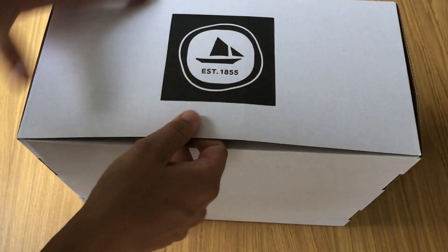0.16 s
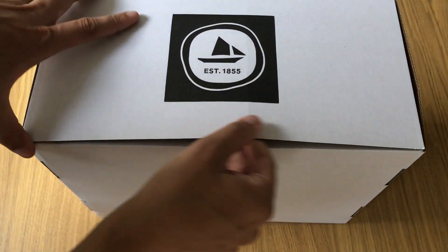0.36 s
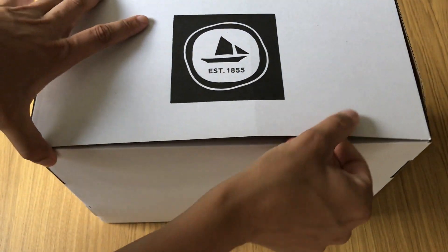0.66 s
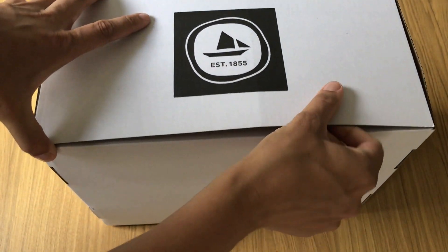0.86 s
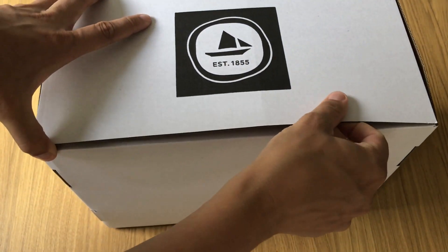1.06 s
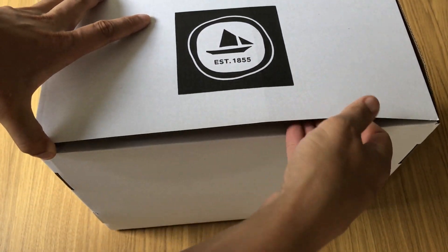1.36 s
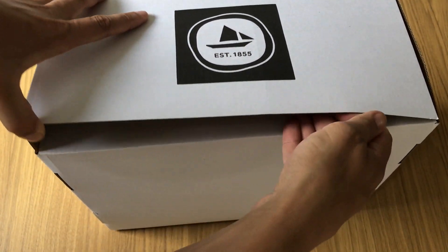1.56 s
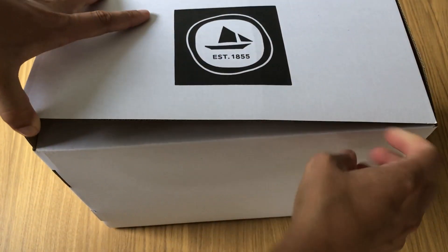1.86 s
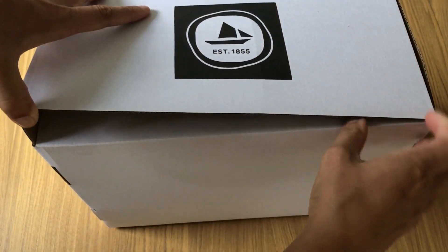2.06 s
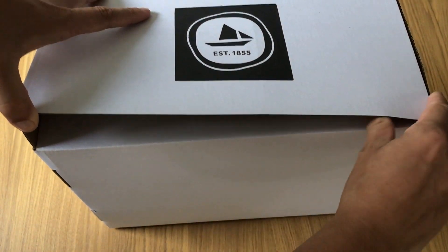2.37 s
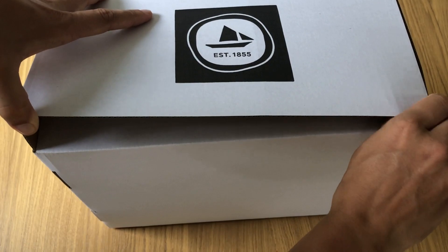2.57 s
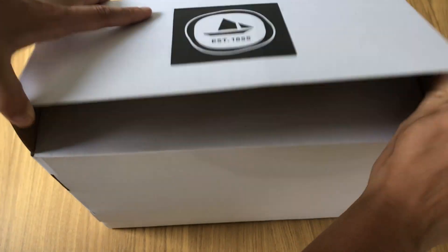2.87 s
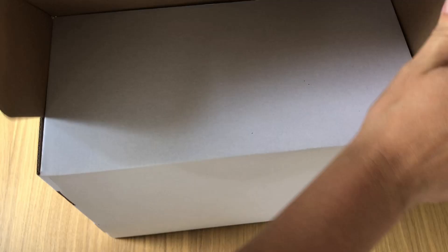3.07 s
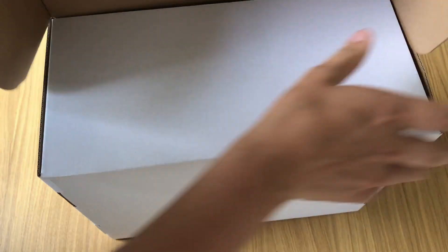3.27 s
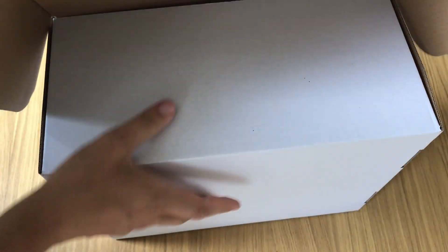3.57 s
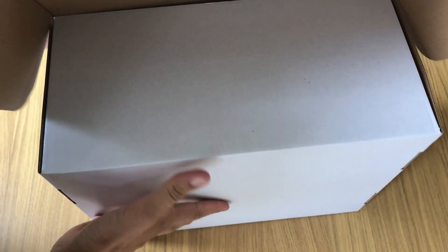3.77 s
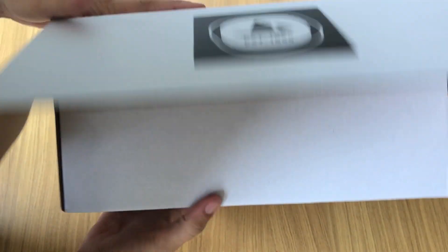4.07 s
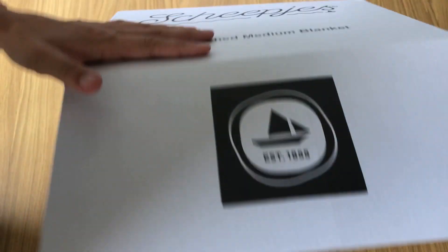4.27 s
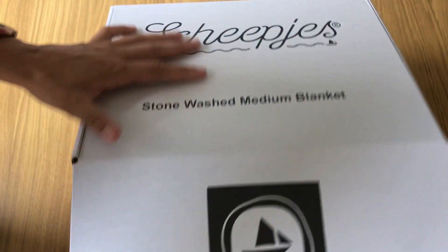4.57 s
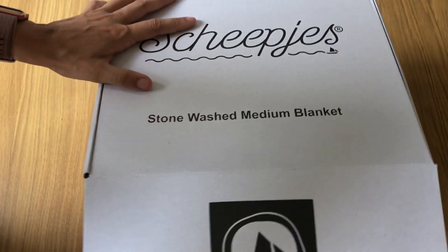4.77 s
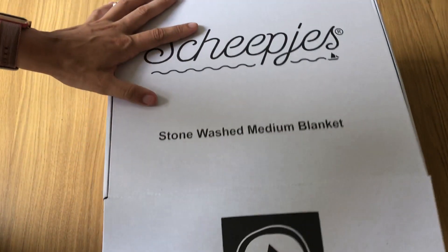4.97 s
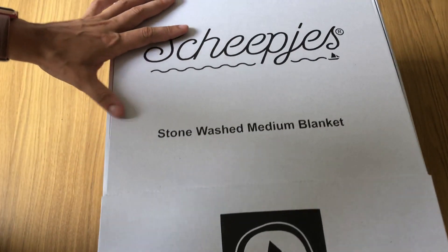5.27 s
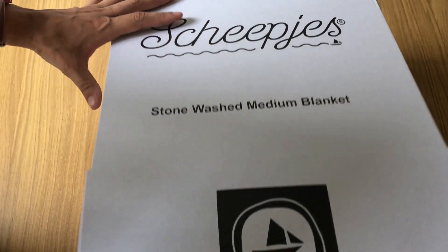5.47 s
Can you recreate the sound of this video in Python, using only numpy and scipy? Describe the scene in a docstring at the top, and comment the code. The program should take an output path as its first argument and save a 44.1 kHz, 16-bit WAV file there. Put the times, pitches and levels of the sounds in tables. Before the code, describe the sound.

Skin brushes dry cardboard, with faint fingertip rasps and small edge clicks. Prying grows into gritty scraping and hollow panel knocks. The flaps slide out with a falling rub, hands sweep brightly across the board, the box shifts with dull thuds, and the folded lid settles with knocks and a tiny creak. One close microphone, quiet indoor room, little reverberation.

```python
"""Hands rub and pry at the front lip of a cardboard box on a wooden table, amid panel knocks and edge ticks.
From 1.9 s the side flaps scrape, two of them sliding with shifting resonances; near 3.3 s the lid swings open
and the echoes of the skin hiss lengthen. The folded-back lid creaks once near 5.2 s, over a quiet room and air.
Friction is snaps in noise, shaped by spectra and resonances; knocks and ticks are decaying sines and noise bursts.
One close microphone, the same in both channels."""
import sys
import numpy as np
from scipy import signal
from scipy.fft import rfft, irfft, next_fast_len
from scipy.io import wavfile
from scipy.ndimage import uniform_filter1d

SR = 44100
rng = np.random.default_rng(int(sys.argv[2]) if len(sys.argv) > 2 else 0)


def master(y):
    """Save y as 16-bit WAV."""
    cut = np.clip(np.atleast_2d(y).T, -1, 1)
    pcm = np.round(cut * 32767)  # scale
    wavfile.write(sys.argv[1], SR, pcm.astype(np.int16))


N = 248283
TIME = np.arange(N) / SR


def amp(db):
    """Decibels to gain."""
    return 10 ** (np.asarray(db) / 20)


def evened(x):
    """Scales to rms 1."""
    return x / np.sqrt(np.mean(x ** 2) + 1e-20)


def read(points, hz):
    """Interpolates a table of (Hz, value) on a log-frequency axis."""
    f, value = np.transpose(points)
    return np.interp(np.log(hz + 1), np.log(f + 1), value)


def curves(rows):
    """The columns of a time table at every sample."""
    s, *columns = np.transpose(rows)
    return [np.interp(TIME, s, column) for column in columns]


def during(rows):
    """1 between the first and last row of a table, with soft ends."""
    inside = (TIME > rows[0][0]) & (TIME < rows[-1][0])
    return uniform_filter1d(1. * inside, size=200)


def add(mix, s, sound):
    """Mixes a sound in at time s."""
    part = mix[max(round(s * SR), 0):][:len(sound)]
    part += sound[:len(part)]


def colour(x, points):
    """Gives x a spectrum, at rms 1."""
    size = next_fast_len(N)
    gain = amp(read(points, np.fft.rfftfreq(size, 1 / SR)))
    return evened(irfft(rfft(x, size) * gain, size)[:N])


def wander(hz):
    """Smooth chance with hz new values a second, at rms 1."""
    return evened(np.interp(TIME * hz, np.arange(24000), rng.standard_normal(24000)))


def resonate(x, hz, width_hz):
    """A resonance of gain 1 that can follow a curve: shift to 0 Hz, low-pass, shift back."""
    turn = np.exp(2j * np.pi * np.cumsum(hz * np.ones(len(x))) / SR)
    r = np.exp(-np.pi * width_hz / SR)
    return 2 * (turn * signal.lfilter([1 - r], [1, -r], x / turn + 1e-18)).real


def ring(x, modes, tuning):
    """Passes x through resonances whose pitches all move by one tuning factor, at rms 1."""
    return evened(sum(amp(db) * resonate(x, hz * tuning, width_hz) for hz, width_hz, db in modes))


def gliding_band(hz, width_hz):
    """Friction noise through a steep resonance that follows a curve, at rms 1."""
    once = resonate(rng.standard_normal(N), hz, width_hz)
    return evened(resonate(once, hz, width_hz))


def friction(per_s, spread_db, share):
    """Fibres catching and letting go: snaps of uneven size, holding a share of the power, in a dense fizz."""
    size = amp(spread_db * np.minimum(rng.exponential(1, N), 4))
    snaps = size * rng.choice([-1, 1], N) * (rng.random(N) < per_s / SR)
    return np.sqrt(share) * evened(snaps) + np.sqrt(1 - share) * rng.standard_normal(N)


RISE_POWER, FALL_POWER = 0.88, 2.4  # a movement starts briskly and trails off


def swell(s, rise, fall):
    """One movement: speed arches up from rest to 1 at time s and eases back to rest."""
    u = np.clip((TIME - s) / np.where(TIME < s, rise, fall), -1, 1)
    out, moving = np.zeros(N), abs(u) < 1
    power = np.where(u[moving] < 0, RISE_POWER, FALL_POWER)
    out[moving] = np.cos(np.pi / 2 * u[moving]) ** power
    return out


def movements(rows, rest_db):
    """One gain curve per level column; overlapping movements add in power over a steady rest level."""
    speeds = np.array([swell(*row[:3]) for row in rows])
    levels = amp([row[3:] for row in rows])
    return np.sqrt(levels.T ** 2 @ speeds ** 2 + amp(rest_db)[:, None] ** 2)


# Strokes of a hand or flap over the board. Each row: fastest at in seconds, rise in seconds, fall in seconds,
# then levels before trim: skin hiss in dB, skin rasp in dB, board scrape in dB, upper panel modes in dB.
STROKE_ROWS = [(.01, 0.042, 0.12, -36.5, -46.5, -47.5, -53), (.115, 0.036, 0.039, -58, -59, -56, -56),
               (.17, 0.58, 0.29, -65, -59, -56, -60), (.245, .035, 0.056, -57, -65, -69, -69),
               (.38, 0.097, 0.14, -46.5, -50.5, -58, -70), (.51, 0.14, 0.38, -45, -48, -55.5, -62.5),
               (.86, 0.21, 0.12, -67, -60.5, -57, -65.5), (1.0, 0.1, 0.29, -74, -63.5, -69, -80),
               (1.24, 0.13, 0.13, -57.5, -53, -56.5, -60), (1.365, 0.21, 0.062, -71, -69, -56, -56.5),
               (1.48, 0.013, 0.047, -63, -75, -56.5, -55), (1.625, 0.085, 0.18, -49.5, -50.5, -45.5, -53.5),
               (1.76, 0.062, 0.081, -55, -57, -47, -58), (1.87, 0.05, 0.055, -54.5, -54.5, -53, -59),
               (1.96, 0.075, 0.051, -52, -54.5, -49.5, -66), (2.03, 0.09, 0.13, -76, -68, -52, -51),
               (2.088, 0.012, 0.021, -67, -53, -53, -54), (2.17, 0.038, 0.17, -69, -55.5, -48.5, -50),
               (2.27, 0.036, 0.19, -53, -57.5, -63, -72), (2.37, 0.045, 0.082, -54, -55, -53, -63),
               (2.47, 0.041, 0.086, -55, -52.5, -47.5, -68), (2.72, 0.42, 0.06, -64, -53.5, -50.5, -64.5),
               (2.815, 0.1, 0.067, -67, -45.5, -41, -44), (2.92, 0.17, 0.1, -48, -48.5, -47, -52),
               (3.11, 0.18, 0.16, -40, -41.5, -39.5, -52.5), (3.23, 0.12, 0.25, -47, -47, -44, -56.5),
               (3.35, 0.057, 0.23, -59, -51.5, -59, -55), (3.543, 0.033, 0.037, -45, -53.5, -44, -45),
               (3.58, 0.017, 0.08, -63, -65, -48, -47), (3.64, 0.081, 0.24, -49, -49.5, -75, -62),
               (3.82, 0.098, 0.17, -44.5, -48.5, -64, -62), (3.97, 0.076, 0.22, -56, -49.5, -52, -50.5),
               (4.11, 0.13, 0.098, -40, -49.5, -56, -61), (4.28, 0.19, 0.24, -37.5, -44.5, -53.5, -46.5),
               (4.5, 0.34, 0.2, -50, -48, -51, -51.5), (4.65, 0.084, 0.23, -47, -49, -54.5, -48),
               (4.79, 0.1, 0.25, -46.5, -47.5, -53.5, -49), (5.07, 0.18, 0.18, -51, -49.5, -53.5, -51),
               (5.22, 0.04, 0.14, -56, -55, -52, -46.5), (5.41, 0.16, 0.098, -64, -59.5, -60, -56.5),
               (5.53, 0.12, 0.22, -55.5, -54, -53.5, -54.5)]
RESTING_DB = (-87, -80, -68, -68)  # resting fingers never lie quite still; same four levels


def stroke_gains():
    """Sliding speed of hands and flaps sets the gains of hiss, rasp, scrape and upper panels."""
    return movements(STROKE_ROWS, RESTING_DB)


# The lid swings open.
SWING_S = (3.27, 0.17, 0.187)  # fastest at, rise, fall
SWING_OCTAVES_PER_S = 1.3
NEAR_ECHO_S = (.0003, .0016)  # shortest and longest delay before swing and drift


def reflected(x, strength, swing_strength, travel):
    """Table, walls and lid return short echoes that drift with the hand and lengthen as the lid swings."""
    s, rise, fall = SWING_S
    opening = SWING_OCTAVES_PER_S * np.clip(TIME - s, -rise, fall)
    delays = np.geomspace(*NEAR_ECHO_S, num=6)
    echoes = np.zeros(N)
    for k, delay in enumerate(delays):
        moving_delay = delay * 2 ** (opening + travel * wander(hz=2))
        echoes += (-1) ** k * np.interp(TIME - moving_delay, TIME, x)
    echo = strength + swing_strength * swell(*SWING_S)
    mixed = (x + echo * echoes / np.sqrt(len(delays))) / np.sqrt(1 + echo ** 2)
    return np.std(x) * evened(mixed)


def bounce(x, delay_s, travel, strength):
    """The table reflects the sound; the delay drifts as the contact point moves."""
    delay = delay_s * np.exp(travel * wander(hz=2.5))
    return evened(x + strength * np.interp(TIME - delay, TIME, x))


# Spectra of skin hiss, skin rasp and board edge. Each row: frequency in Hz, relative density in dB per Hz.
HISS_SPECTRUM = [(1500, -21), (3500, -11), (6000, 1.5), (8000, 0.5), (11500, -1), (14500, 0.5),
                 (16000, 2.5)]
RASP_SPECTRUM = [(900, -12), (1700, 1), (2600, 1.5), (3800, 2), (5000, 0), (7000, -5.5), (11000, -9.5)]
SCRAPE_SPECTRUM = [(250, -36), (500, -13.5), (750, 0), (1000, 0), (1300, 3), (1800, 0), (2500, -9),
                   (4500, -41.5)]
# Resonances of the pried front lip and of the scraped flap, before bending drift.
# Each row: frequency in Hz, width in Hz, level in dB.
LIP_MODES = [(637, 49, -3), (833, 110, -1), (970, 100, 5.5), (1237, 44, 3.5), (2160, 91, -1),
             (2500, 230, 2.5), (2950, 140, -6)]
FLAP_MODES = [(996, 26, -10.5), (1203, 185, -10.5), (1485, 57, -12.5), (1930, 290, -25), (2450, 210, -22)]
LIP_UNTIL_S = 1.9  # then the side flaps scrape
BOARD_DRIFT, BOARD_DRIFT_HZ = .018, 9  # rms drift of log pitch


def rubbing(hiss_gain, rasp_gain, scrape_gain):
    """Skin and board edges slide; one uneven grip shakes all of the friction together."""
    grip_db = wander(hz=170.2) + 0.86 * wander(hz=43.37)
    fibres = friction(per_s=5800, spread_db=5.5, share=0.086)
    hiss = colour(fibres, HISS_SPECTRUM) * hiss_gain * amp(.5 * grip_db)
    ridges = friction(per_s=1400, spread_db=2, share=0.4) * amp(1.2 * wander(hz=110))
    rasp = colour(ridges, RASP_SPECTRUM) * rasp_gain * amp(.5 * grip_db)
    skin = reflected(hiss + rasp, strength=.17, swing_strength=.25, travel=.3)

    catches = friction(per_s=1100, spread_db=1.5, share=0.89) * amp(0.04 * grip_db)
    edge_friction = friction(per_s=600, spread_db=3.5, share=0.31) * amp(.5 * grip_db)
    edge = colour(edge_friction, SCRAPE_SPECTRUM)
    edge = amp(-5.0) * bounce(edge, delay_s=0.002205, travel=0.248, strength=1.0)

    prying = uniform_filter1d(1. * (TIME < LIP_UNTIL_S), size=2000)
    bending = np.exp(BOARD_DRIFT * wander(hz=BOARD_DRIFT_HZ))
    lip = prying * amp(-5.5) * ring(catches, LIP_MODES, bending)
    flap = (1 - prying) * amp(-3.5) * ring(catches, FLAP_MODES, bending)
    return skin + (edge + lip + flap) * scrape_gain


# Bands of friction noise, steady or gliding. Each row: loudest at in seconds, rise in seconds, fall in seconds,
# level in dB, centre at the loudest point in Hz, glide in octaves per second, width in Hz.
FRICTION_BAND_ROWS = [(.5, .25, .35, -60, 2580, 0.23, 300), (.58, .3, 0.3, -58, 3570, .4, 500),
                      (1.0, .06, 0.079, -61, 1870, -0.48, 300), (2.28, .05, .25, -60, 10700, -0.6, 2800),
                      (2.6, 0.12, 0.3, -67, 10300, 0, 1000), (2.56, .12, 0.14, -63, 13400, 0, 2500),
                      (3.18, .05, .05, -56, 11200, -1, 450), (3.24, .05, .06, -59, 8600, -1, 500),
                      (3.23, .04, .1, -57, 12800, -1, 600), (3.29, 0.037, .07, -54, 11100, -1, 500),
                      (3.34, 0.022, .06, -54, 8050, -1, 600), (3.335, .02, .05, -55, 14500, -1, 700),
                      (3.44, 0.035, 0.063, -60.5, 3840, -2.2, 700),
                      (3.45, .04, 0.043, -59, 10100, -1.2, 1500),
                      (3.63, 0.042, 0.37, -46, 14400, 1.6, 5500), (3.81, 0.045, 0.052, -47, 3300, 2, 1600),
                      (3.87, 0.12, 0.13, -49, 14500, .05, 5000)]


def friction_bands():
    """Noise bands: resonances within the skin strokes, thin high swishes, falling streaks as the lid swings."""
    out = np.zeros(N)
    for s, rise, fall, db, hz, glide, width_hz in FRICTION_BAND_ROWS:
        centre_hz = hz * 2 ** (glide * np.clip(TIME - s, -rise, fall))
        out += amp(db) * swell(s, rise, fall) * gliding_band(centre_hz, width_hz)
    return out


# The first flap rubs in its slot, then leaves it; the second drags along the box wall.
# Each row: time in seconds, level in dB, resonance in Hz.
FIRST_FLAP_SLIDE = [(2.73, -54, 1400), (2.81, -42, 1280), (2.86, -76, 1230), (3.0, -76, 1490),
                    (3.045, -42.5, 1330), (3.08, -38, 1100), (3.11, -42, 880), (3.135, -39.5, 690),
                    (3.15, -52, 600), (3.168, -48, 530), (3.19, -51, 480), (3.22, -49, 453),
                    (3.27, -55, 410)]
SECOND_FLAP_SLIDE = [(3.02, -47, 1560), (3.1, -61, 1510), (3.2, -51, 1440), (3.27, -49.5, 1390),
                     (3.33, -57, 1560), (3.39, -60, 1500)]
SLIDE_WIDTH_HZ, SLIDE_OVERTONE_DB = 130, -14


def sliding_flap(slide):
    """Friction noise excites a flap's resonance and its octave, which shift with its free length."""
    db, hz = curves(slide)
    octave = gliding_band(2 * hz, SLIDE_WIDTH_HZ)
    band = gliding_band(hz, SLIDE_WIDTH_HZ) + amp(SLIDE_OVERTONE_DB) * octave
    return band * amp(db) * during(slide)


# Cut edges catching on each other. Each row: hardest at in seconds, rise in seconds, fall in seconds, level in dB.
CRACKLE_ROWS = [(1.27, 0.084, .06, -57), (1.66, .1, 0.17, -50), (2.175, 0.042, .1, -59),
                (3.57, 0.066, .09, -56), (4.72, 0.15, 0.25, -59)]
# Their spectrum. Each row: frequency in Hz, relative density in dB per Hz.
CRACKLE_SPECTRUM = [(500, -39), (1100, 4), (2000, -0.5), (3100, -1), (4500, -17), (8000, -14)]


def crackling():
    """Cut edges snag fibre by fibre: sparse, dry snaps."""
    snaps = colour(friction(per_s=420, spread_db=2.5, share=1), CRACKLE_SPECTRUM)
    return snaps * sum(amp(db) * swell(s, rise, fall) for s, rise, fall, db in CRACKLE_ROWS)


# The fold creaking; its main resonance jumps as the fold gives.
# Each row: time in seconds, level before trim in dB, mean slips per second, main resonance in Hz.
CREAK_ROWS = [(5.195, -44, 119, 478), (5.222, -45, 119, 474), (5.236, -42, 143, 572), (5.26, -41, 143, 572),
              (5.3, -47, 143, 572), (5.32, -56, 140, 565), (5.342, -43, 140, 560), (5.365, -60, 138, 555)]
# Other resonances of the fold. Each row: frequency before tuning in Hz, width in Hz, level in dB.
FOLD_MODES = [(310, 44, 7), (765, 44, -17), (1416, 41, -6), (1680, 58, 3), (2720, 88, -12), (3800, 67, -11),
              (14400, 900, -14)]
CREAK_JITTER, CREAK_WIDTH_HZ = .11, 42  # rms of log slip rate; width of main resonance


def creak():
    """Uneven slips in the fold ring the lid with a hollow note."""
    db, slips_per_s, hz = curves(CREAK_ROWS)
    uneven_rate = slips_per_s * np.exp(CREAK_JITTER * wander(hz=144.2))
    count = np.floor(np.cumsum(uneven_rate) / SR)
    slips = np.diff(count, prepend=0) * amp(2.5 * wander(hz=200))
    drive = evened(slips) + .3 * rng.standard_normal(N)
    note = evened(resonate(drive, hz, CREAK_WIDTH_HZ))
    return amp(-5.5) * (note + ring(drive, FOLD_MODES, 0.99)) * amp(db) * during(CREAK_ROWS)


# Ticks of nails and edges. Each row: snap at in seconds, level in dB, centre in Hz, treble in dB,
# drag before the snap in seconds, ring in Hz, ring in dB, echo delay off the nearest panel in seconds.
TICK_ROWS = [(.897, -52.5, 4000, -7, .004, 1700, -7, 0.00069),
             (.945, -53, 2300, -20, .0005, 604, 9, 0.00053),
             (1.012, -51.5, 2970, -7, 0.039, 1800, -4, 0.00062),
             (1.289, -53.5, 1500, -15, .002, 920, 13.5, 0.00088),
             (1.363, -43, 3500, -5.5, 0.005, 1080, 4, 0.00078),
             (1.37, -50.5, 2200, -14, .001, 970, 15, 0.0009),
             (1.4471, -48.5, 2170, -27, 0.00023, 1000, 14, 0.00074),
             (1.545, -48.5, 1400, -13, 0.00047, 1190, -6, 0.00056),
             (1.5757, -34, 1250, -26, 0.0004, 980, 5, 0.00076),
             (1.779, -47, 1880, -12, .0008, 1210, 8, 0.00078),
             (1.8104, -40.5, 3280, -2, 0.00037, 870, 8.5, 0.0011),
             (1.974, -37.5, 2300, -19, 0.009, 1320, 12, .0016),
             (1.978, -32.5, 2850, -11, 0.0026, 880, 10, 0.0015),
             (2.043, -46, 4100, -6, 0.001, 1260, -7, 0.00048),
             (2.142, -48, 2000, -2, 0.00023, 1180, 10, .00084),
             (2.179, -40.5, 2920, -20, 0.0043, 1180, 14, 0.00075),
             (2.833, -44.5, 3500, 9.5, 0.018, 970, 7, 0.00071),
             (3.076, -51, 3000, -6, .003, 1220, 7, 0.0011),
             (3.166, -45, 1300, -15, .0027, 1280, 16, 0.00078),
             (3.2, -38.5, 3200, 0, 0.0021, 1250, 2, 0.00093),
             (3.391, -49.5, 1200, 8.5, 0.00077, 1230, 11, 0.00082),
             (3.48, -52.5, 3300, 5, .001, 2600, 2, 0.00034),
             (3.544, -35.5, 2130, 9, 0.0036, 1110, 10, 0.0019),
             (3.572, -45, 1800, -12, .0003, 1250, 6, 0.00057),
             (4.5531, -43.5, 2200, -17, 0.0012, 620, 17, 0.0014),
             (4.636, -51.5, 1300, -20, .0018, 1320, 16, 0.0006),
             (4.719, -51, 1300, -20, .002, 1200, 12, 0.00072),
             (4.857, -42.5, 1700, -10, 0.0016, 426, 3, 0.00061),
             (5.1926, -35.5, 3200, -1, 0.00015, 1350, 9, 0.00073),
             (5.408, -46, 2100, -22, .00036, 1260, 10.5, 0.00067)]
TICK_DECAY_S, DRAG_SHARE = 0.0027, 0.15  # a longer drag also dies away more slowly
CRACK_DB = 7  # the clean click at the instant of release
TICK_ECHO = 0.36
BOARD_CUT_HZ, FIZZ_HZ = 5500, 7200  # the board passes little above its cut; the fibres fizz higher up


def ticks():
    """An edge drags and snaps free: burst, click and short ring of the stiff board, echoed by a panel."""
    out, t = np.zeros(N), np.arange(-SR // 12, SR // 12) / SR
    after = np.maximum(t, 0)
    board = signal.butter(2, BOARD_CUT_HZ, fs=SR)
    top = signal.butter(2, FIZZ_HZ, "high", fs=SR)
    release = np.diff(1. * (t > 0), prepend=0)
    for s, db, hz, treble_db, drag, ring_hz, ring_db, echo_s in TICK_ROWS:
        band = signal.butter(1, [hz * .6, hz * 1.4], "band", fs=SR)
        fibres, fizz = rng.standard_normal((2, len(t)))
        body = evened(signal.lfilter(*board, signal.lfilter(*band, fibres)))
        fizz = evened(signal.lfilter(*top, fizz))
        shape = np.exp(-np.maximum(-t / drag, t / (TICK_DECAY_S + DRAG_SHARE * drag)))
        burst = shape * (body + amp(treble_db) * fizz)
        # first two bending modes of a strip, damped within a few cycles
        turn = 2 * np.pi * ring_hz * after
        snap = (np.sin(turn) + .25 * np.sin(2.76 * turn)) * np.exp(-after / .0019)
        crack = amp(CRACK_DB) * signal.lfilter(*band, release) * np.sqrt(SR / hz)
        tick = amp(db) * (burst + crack + amp(ring_db) * snap)
        echo = TICK_ECHO * np.interp(t - echo_s, t, tick)
        add(out, s + t[0], (tick + echo) / np.hypot(1, TICK_ECHO))
    return out


# Soft knocks of the panels. Each row: start in seconds, level in dB, thump in Hz,
# decay time constant in seconds, ring of the box relative to level in dB.
KNOCK_ROWS = [(0.108, -39, 118, 0.007, -23), (0.1218, -17, 302, 0.00088, -44),
              (0.136, -42.5, 131, 0.012, -27), (.2, -44, 202, .01, -20), (.33, -46.5, 106, 0.023, -17),
              (1.179, -43.5, 215, 0.026, -21), (1.29, -43, 199, 0.022, -29),
              (1.361, -44.5, 294, 0.012, -12), (1.447, -49, 248, 0.0062, -1.5),
              (1.545, -45.5, 219, 0.022, -6), (1.905, -43, 153, 0.011, -22),
              (1.981, -24.5, 417, 0.0041, -12), (1.989, -19, 179, 0.0093, -22.5),
              (2.15, -39.5, 227, 0.012, -0.5), (2.179, -34.5, 188, 0.011, -6.5),
              (2.463, -42, 121, 0.03, -26), (2.831, -41, 131.5, 0.072, 1), (3.394, -38.5, 447, 0.0094, -30),
              (3.555, -34, 51.3, 0.07, -20), (3.574, -40, 100, 0.013, -14), (3.586, -40, 143, 0.014, -9),
              (4.031, -30, 57.7, 0.016, -33), (4.534, -29, 327, 0.0032, -27),
              (4.5581, -21, 187, 0.0075, -23), (4.568, -44.5, 127, 0.13, -12),
              (4.636, -40, 302, 0.0092, -16), (4.857, -35.5, 452, 0.0043, -14),
              (5.197, -35.5, 243, 0.0046, -12), (5.4092, -21.5, 383, 0.0013, -29)]
# Modes of the hollow box. Each row: frequency in Hz, level in dB, t60 in seconds.
BOX_MODES = [(123, -15, 0.34), (187.2, 10.5, 0.095), (234, -8.5, 0.15), (303, -17, 0.053),
             (395.9, -9.5, 0.57), (472, 0, 0.053), (561.5, 6, 0.073), (716, -4, 0.073), (814, -4.5, 0.22),
             (899, -17.5, 0.23), (1177, 5.5, 0.059), (1360, -7, 0.095)]


def knocks():
    """A panel springs back with a short thump, and the hollow box rings on."""
    out, t = np.zeros(N), np.arange(SR // 2) / SR
    box = np.zeros(len(t))
    for k, (hz, db, t60) in enumerate(BOX_MODES):
        # neighbouring modes swing in opposite directions
        box += (-1) ** k * amp(db - 60 * t / t60) * np.sin(2 * np.pi * hz * t)
    box = box * (1 - np.exp(-t / 0.0081))
    for s, db, hz, decay, ring_db in KNOCK_ROWS:
        thump = np.sin(2 * np.pi * hz * t) * np.exp(-t / decay) * (1 - np.exp(-t / 0.00082))
        add(out, s, amp(db) * (thump + amp(ring_db) * box))
    return out


# Pushes that flex the panels and shift the box on the table. Each row: hardest at in seconds, rise in seconds,
# fall in seconds, drumming before trim in dB, rumble before trim in dB.
PUSH_ROWS = [(.13, 0.074, 0.17, -49, -59), (.32, 0.05, 0.12, -58, -54), (.55, 0.1, 0.17, -58, -63),
             (1.27, 0.13, 0.2, -53, -74), (1.67, 0.17, 0.42, -49, -67), (2.03, 0.083, 0.17, -40.5, -66),
             (2.21, 0.044, 0.2, -45.5, -55), (2.47, 0.013, 0.22, -60, -69), (2.765, 0.064, 0.15, -42, -61),
             (2.87, 0.033, 0.17, -45, -46.5), (3.05, 0.086, 0.13, -48, -57), (3.25, 0.53, 0.37, -53, -59),
             (3.59, 0.068, 0.18, -41, -45), (3.82, 0.077, 0.14, -60, -55), (3.96, 0.06, 0.1, -43, -45),
             (4.04, 0.08, 0.12, -52, -37.5), (4.22, 0.24, 0.18, -48, -64), (4.4, 0.053, 0.092, -60, -65),
             (4.57, 0.07, 0.11, -43, -50), (4.67, 0.067, 0.19, -49, -53), (4.85, 0.09, 0.058, -51, -55),
             (5.16, 0.048, 0.22, -45.5, -49), (5.41, 0.15, 0.2, -66, -54), (5.58, 0.17, 0.24, -50.5, -63)]
LEANING_DB = (-65.5, -71)  # steady weight of the hands, before trim: drumming, rumble
# Spectra of the panels and of the box on the table. Each row: frequency in Hz, relative density in dB per Hz.
LOW_PANEL_SPECTRUM = [(50, -27), (80, -19), (105, -8), (123, 5.5), (143, -4), (165, -2.5), (184, 0.5),
                      (212, -4.5), (245, -8.5), (330, -33), (600, -56)]
HIGH_PANEL_SPECTRUM = [(170, -15), (260, -6), (305, 5), (355, -4.5), (410, -1), (520, -4), (680, -9),
                       (1000, -10.5), (2000, -40)]
RUMBLE_SPECTRUM = [(18, -50), (30, -22), (42, -2), (52, 2), (64, -5), (82, -3), (120, -9), (250, -40)]


def panels(upper_gain):
    """Slipping fingers drum the broad panels, and the box rumbles on the table."""
    drum_gain, rumble_gain = movements(PUSH_ROWS, LEANING_DB)
    low = colour(friction(per_s=150, spread_db=3.0, share=0.77), LOW_PANEL_SPECTRUM) * drum_gain
    high = colour(friction(per_s=350, spread_db=3.5, share=0.57), HIGH_PANEL_SPECTRUM) * upper_gain
    rumble = colour(rng.standard_normal(N), RUMBLE_SPECTRUM) * rumble_gain
    return amp(-4.0) * low + amp(-1.0) * high + amp(-4.0) * rumble


# Decay of the room. Each row: frequency in Hz, t60 in seconds.
ROOM_DECAY = [(100, 0.38), (500, 0.39), (2000, 0.15), (6000, 0.066), (16000, 0.074)]


def room(x):
    """A small room's tail: sparse reflections, the treble dying sooner than the bass."""
    size = SR // 2
    hits = rng.random(size) < 3000 / SR
    taps = rng.standard_normal(size) * hits * (TIME[:size] > .004)
    hz, t, z = signal.stft(taps, SR, nperseg=256)
    decay = amp(-60 * t / read(ROOM_DECAY, hz)[:, None])
    tail = signal.istft(z * decay, SR, nperseg=256)[1]
    return signal.fftconvolve(x, tail / np.linalg.norm(tail))[:N]


# Spectrum of the still air. Each row: frequency in Hz, relative density in dB per Hz.
AIR_SPECTRUM = [(20, -25), (60, -14), (150, 3), (400, -2), (1000, -21), (4000, -23.5), (16000, -33)]


def still_air():
    """Faint steady noise of the still air."""
    return amp(-62.5) * colour(rng.standard_normal(N), AIR_SPECTRUM)


def scene():
    """The box close by, its room, and faint still-air noise."""
    hiss, rasp, scrape, upper = stroke_gains()
    sliding = rubbing(hiss, rasp, scrape) + friction_bands() + crackling() + panels(upper)
    sliding += sliding_flap(FIRST_FLAP_SLIDE) + sliding_flap(SECOND_FLAP_SLIDE) + creak()
    hits = ticks() + knocks()
    reverb = room(amp(-16.0) * sliding + amp(-15.0) * hits)
    mono = sliding + hits + reverb + still_air()
    return np.array([mono, mono])


MIC_LOW_HZ, EDGE_HZ = 36, 15850


def record(dry):
    """The microphone's low cut and the recorder's band limit."""
    low_cut = signal.butter(2, MIC_LOW_HZ, "high", fs=SR, output="sos")
    band_limit = signal.firwin(511, EDGE_HZ, window=("kaiser", 9), fs=SR)
    return signal.oaconvolve(signal.sosfilt(low_cut, dry), band_limit[None], "same")


dry = scene()
out = record(dry)
master(out)
```